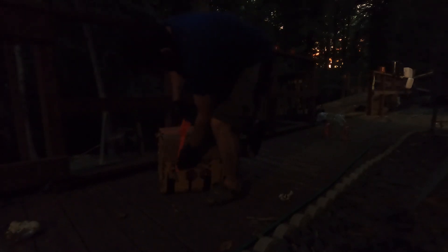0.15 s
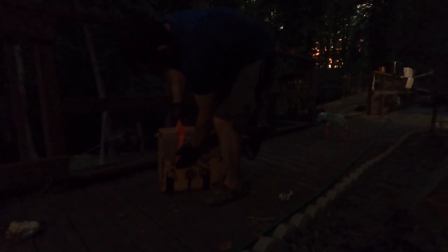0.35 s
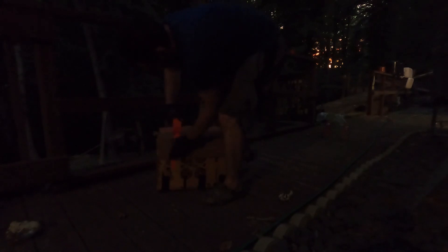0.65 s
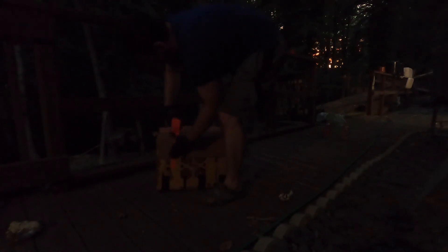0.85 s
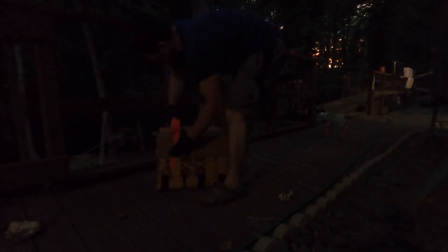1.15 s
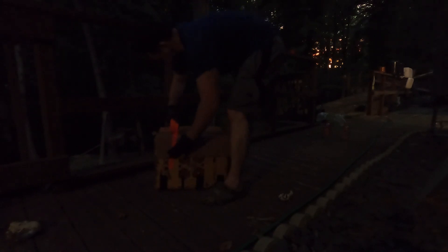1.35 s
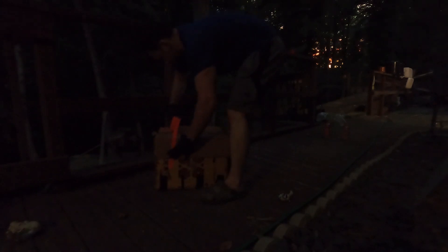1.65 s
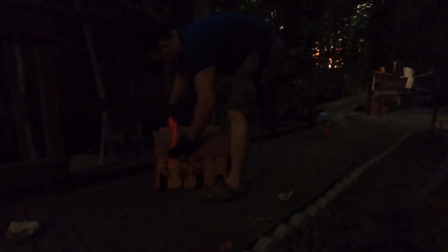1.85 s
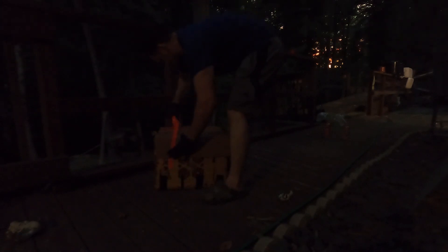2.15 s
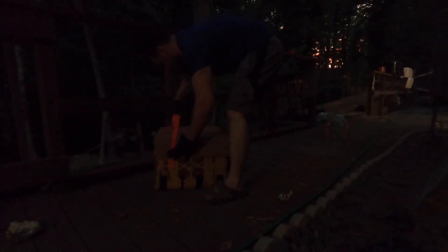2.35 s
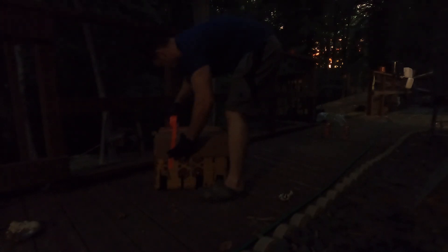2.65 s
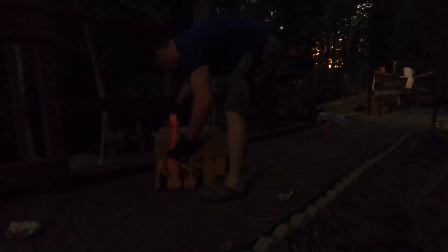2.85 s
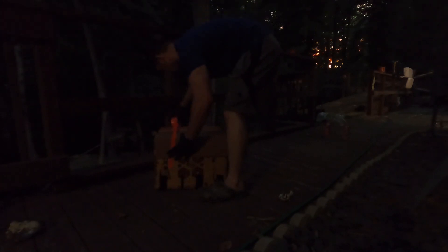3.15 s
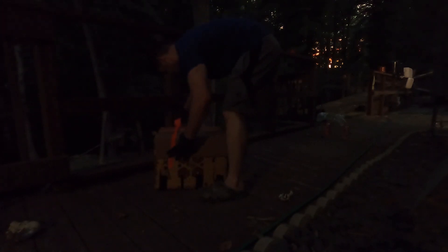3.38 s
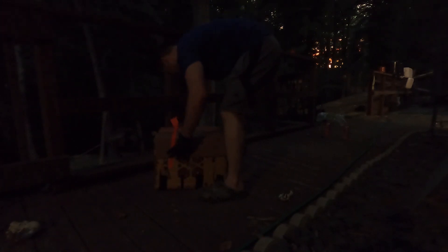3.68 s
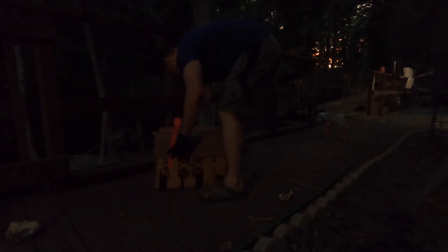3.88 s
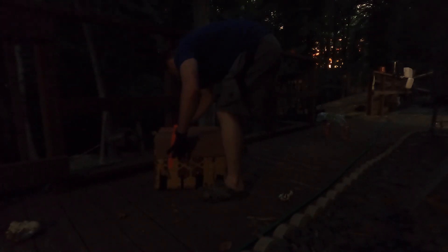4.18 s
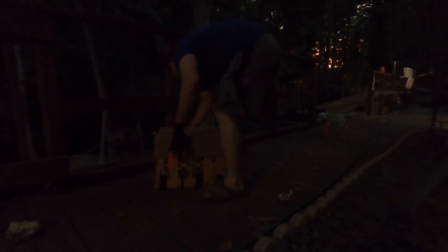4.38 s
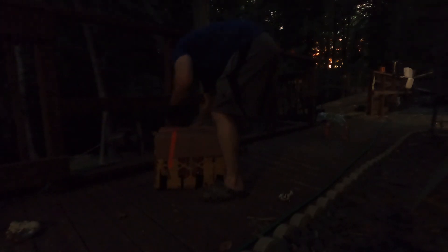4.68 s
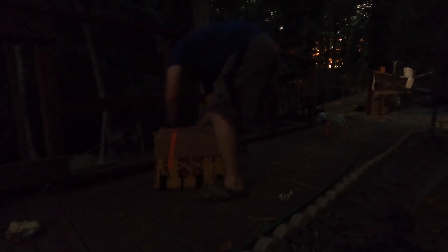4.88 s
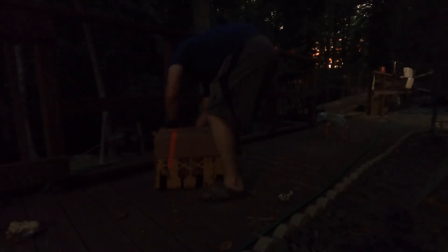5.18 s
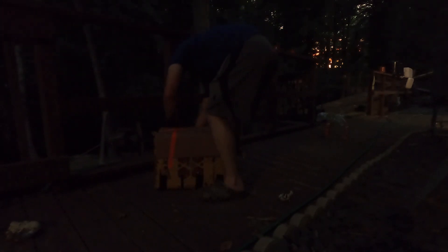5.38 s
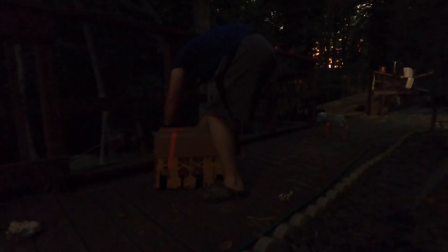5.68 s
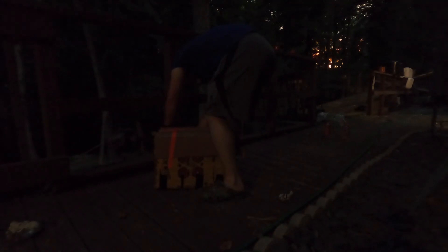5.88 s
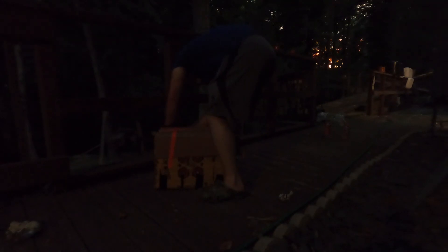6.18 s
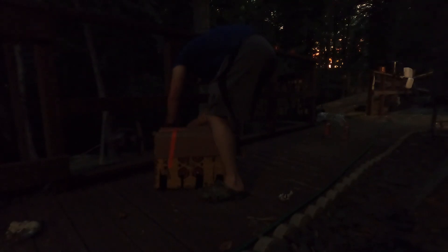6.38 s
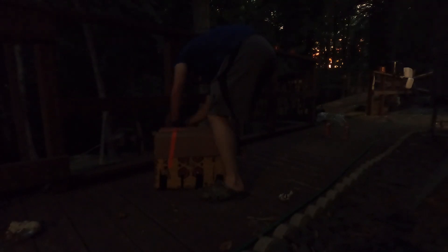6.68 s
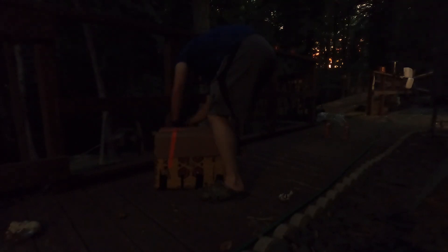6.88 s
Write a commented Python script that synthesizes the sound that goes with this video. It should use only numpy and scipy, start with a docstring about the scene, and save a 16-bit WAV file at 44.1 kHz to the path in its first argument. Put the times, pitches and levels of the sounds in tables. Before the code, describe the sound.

Crickets trill steadily in a yard at night, over a high rasping insect chorus and a faint hush of air. The insects grow slightly louder towards the end. In the first second a metal buckle is tapped lightly, and slack strap slides through it with a soft rasp at about 0.5 seconds. At 1.4 seconds the ratchet is cranked in a quick, loud run of steel clicks. More short runs follow at about 1.8, 2.1, 2.6 and 3 seconds, each with a clink and a dull thump as the taut strap jolts a foam block. After a pause there is a brief burst at 4.1 seconds, a longer, fuller run at 5 seconds and a single click at 6 seconds. Faint handling taps fall between the pulls and continue until about 7 seconds. The ratchet is centred and clear, with a slight outdoor echo.

```python
"""Ratchet strap at night

A ratchet strap is cranked tight around a foam target block in a yard. The pawl (the buckle's catch)
skips over the teeth in short uneven runs; each snap rings the steel and, through the taut strap,
thumps the block. Crickets trill with their wings over a chorus of other insects and a soft hush.
The recorder's gain control turns everything down after a loud pull, then slowly back up."""
import sys
import numpy as np
from scipy import signal
from scipy.fft import rfft, irfft, next_fast_len
from scipy.io import wavfile
from scipy.ndimage import uniform_filter1d

SR = 44100
rng = np.random.default_rng(int(sys.argv[2]) if len(sys.argv) > 2 else 0)


def materialize(psi):
    """Save the field psi as 16-bit PCM at rate SR to the path in sys.argv[1].

    A 1-D psi becomes a single channel; in a 2-D psi each row is a channel.
    """
    bounded = np.clip(np.atleast_2d(psi).T, -1, 1)
    quanta = np.round(bounded * 32767).astype(np.int16)
    wavfile.write(sys.argv[1], SR, quanta)


N = 310023
TIME = np.arange(N) / SR


def ratchet():
    """Each pull of the handle drives the pawl over a run of teeth."""
    # (start [s], length [s], teeth [count], slowing [-1..1], block thump [relative dB], its rise [dB],
    #  frame knock, pawl clink, edge tick [relative dB], rise of clink and tick [dB], strap pitch [Hz],
    #  its sag [octaves], twang [relative dB], frame's favoured pitch [Hz], handle ring [relative dB])
    pulls = [(1.3951, 0.13, 24, 0.046, -30, 14.5, -19.5, -29, -42, -2.5, 490, 1.15, 0.5, 1440, -5.5),
             (1.769, 0.059, 10, 0.43, -25.5, 3.5, -16.5, -27.5, -36.5, 6, 314, 1.05, 0.5, 1420, -8),
             (1.8592, 0.038, 4, 0.3, -22.5, 0, -15.5, -23, -29.5, -1, 496, 0.1, 3, 1310, -5),
             (2.1214, 0.083, 12, 0.1, -24.5, -3, -17.5, -25, -35.5, 6.5, 430, 1.3, 0.5, 1230, -5.5),
             (2.6053, 0.041, 3, 0.23, -21, 2, -16, -20.5, -28.5, -1, 502, 0.87, -2.5, 1250, -7),
             (3.0004, 0.032, 4, 0.1, -24.5, 1, -17.5, -29.5, -35, 7, 427, 0.085, -6, 1650, -10.5),
             (3.0479, 0.0162, 3, 0.6, -25.5, 3.5, -17, -24.5, -33, 6.5, 410, 0.042, -8, 1580, -8.5),
             (4.1253, 0.0325, 6, -0.6, -22.5, -6, -20.5, -29, -44, 3, 366, 0, -2.5, 1570, -9.5),
             (5.0341, 0.11, 14, -0.077, -19, -1.5, -19, -30, -53, 1.5, 371, 0.082, 3, 1370, -9.5),
             (6.0217, 0.0041, 1, 0.34, -21.5, 1.5, -18, -31, -59, -1, 358, 0, 0.5, 1350, -6)]
    return buckle(np.vstack([teeth(pull) for pull in pulls]), twang_boost_db=-2.5)


def teeth(pull):
    """List one blow per tooth: the run slows or quickens, and the effort peaks in mid-pull."""
    (start_s, length_s, count, slowing, thump_db, thump_rise_db, knock_db, clink_db, tick_db,
     clink_rise_db, strap_hz, sag, twang_db, frame_hz, handle_db) = pull
    mid_pull_db, scatter_db, timing_jitter = 2, 1.38, 0.1
    along = np.linspace(0, 1, count)
    middle = np.sin(np.pi * along)
    chance = rng.standard_normal((count, 4)).T
    jitter = timing_jitter * middle * chance[0] / count
    s = start_s + length_s * (along - slowing * along * (1 - along) + jitter)
    thump, knock, clink = mid_pull_db * middle + scatter_db * chance[1:]
    thump += thump_rise_db * (along - .5)
    clink += clink_rise_db * (along - .5)
    return np.transpose(np.broadcast_arrays(
        s, thump_db + thump, knock_db + knock, clink_db + clink, tick_db + clink,
        strap_hz * 2 ** (-sag * along), twang_db, frame_hz, handle_db))


def buckle(blows, twang_boost_db):
    """The frame jerks, the pawl lands just after, and the strap twangs and jolts the block."""
    # how the free length of strap rings: (multiple of its pitch, level [dB], time to fall 60 dB [s])
    strap_modes = [(1, -1, 0.047), (2, -12.5, 0.026)]
    # how each part rings: (pitch [Hz], level [dB], time to fall 60 dB [s])
    block_modes = [(99, -7, 0.095), (128.4, -6, 0.074), (228, -5.5, 0.032), (279, -2, 0.027),
                   (347, -1, 0.036), (425, -2.5, 0.067), (505, -1, 0.06), (626, -3, 0.041), (773, 3, 0.021)]
    frame_modes = [(955, -0.5, 0.019), (1217, -6, 0.029), (1342, 1, 0.039), (1560, 1, 0.012),
                   (1730, 0, 0.032), (1870, -9, 0.033)]
    handle_modes = [(2090, -1, 0.026), (2286, -0.5, 0.022), (2500, -0.5, 0.026), (2674, -0.5, 0.019),
                    (2927, -1.5, 0.02)]
    pawl_modes = [(3324, 0.5, 0.028), (3746, 2.5, 0.021), (4270, -1, 0.016), (4706, 0.5, 0.014),
                  (5240, 2, 0.011), (5970, -2, 0.02), (6400, -1, 0.014), (7130, 0.5, 0.014)]
    edge_modes = [(8970, -5, 0.015), (9200, 2.5, 0.015), (10120, -0.5, 0.018), (10800, -0.5, .01),
                  (11700, -11, .008)]
    s, block_db, frame_db, pawl_db, edge_db, strap_hz, twang_db, frame_hz, handle_db = np.transpose(blows)
    pawl_hz = 6000 * 2 ** ((edge_db - pawl_db) / 30)   # a softer landing is duller
    twang = struck(s, block_db + twang_db + twang_boost_db, strap_modes, lag_s=.0015, rise_s=.00078,
                   scatter_db=4, detune=.014, favoured_hz=strap_hz, focus_db=0, pitch=strap_hz)
    block = struck(s, block_db - np.maximum(twang_db, 0), block_modes, lag_s=.0012, rise_s=.00078,
                   scatter_db=3.5, detune=.032, favoured_hz=strap_hz, focus_db=2.5)
    frame = struck(s, frame_db, frame_modes, lag_s=.0001, rise_s=.00015,
                   scatter_db=2.5, detune=.0077, favoured_hz=frame_hz, focus_db=9.5)
    handle = struck(s, frame_db + handle_db, handle_modes, lag_s=.0002, rise_s=.00011,
                    scatter_db=2, detune=.018, favoured_hz=2500, focus_db=-3)
    pawl = struck(s, pawl_db, pawl_modes, lag_s=.0005, rise_s=.00075,
                  scatter_db=2.5, detune=.051, favoured_hz=pawl_hz, focus_db=14.5)
    edge = struck(s, edge_db, edge_modes, lag_s=.00054, rise_s=.0001,
                  scatter_db=0, detune=.029, favoured_hz=9500, focus_db=7)
    grind = from_db(6) * crunch(s, pawl_db, length_s=.012, low_hz=2750, high_hz=5430)
    # the strap slips on the spool
    creak = from_db(-14.5) * crunch(s, frame_db, length_s=.026, low_hz=746, high_hz=1910)
    snap = from_db(12) * crunch(s, edge_db, length_s=.0015, low_hz=4500, high_hz=11500)
    thump = band(from_db(-3) * block + from_db(-5.5) * twang, 83, 1640)   # small block: no deep bass
    knock = band(from_db(-1.16) * frame + from_db(-1.45) * handle, 510, 4800)
    clink = from_db(-0.54) * band(pawl, 1800, 14000) + from_db(-3) * edge
    return thump + knock + clink + grind + creak + snap


def struck(times, levels_db, modes, lag_s, rise_s, scatter_db, detune, favoured_hz, focus_db, pitch=1):
    """Each blow rings a part's own tones (modes); positive focus favours those near one pitch."""
    base, db, ring_s = np.transpose(modes)[:, :, None]
    t = np.arange(SR // 14) / SR
    out = np.zeros(N)
    dying = from_db(db - 60 * t / ring_s) * (1 - np.exp(-t / rise_s))
    for s, level_db, favoured, scale in np.broadcast(times, levels_db, favoured_hz, pitch):
        strength, shift = rng.standard_normal((2, len(base), 1))
        hz = base * scale * (1 + detune * shift)
        share = from_db(scatter_db * strength - focus_db * np.abs(np.log2(hz / favoured)))
        ring = np.sum(share * dying * np.sin(2 * np.pi * (hz * t + rng.random(hz.shape))), axis=0)
        # the level is the blow's energy spread over a hundredth of a second
        add(out, s + lag_s, from_db(level_db) * ring / np.sqrt(np.sum(ring ** 2) / (SR / 100)))
    return out


def crunch(times, levels_db, length_s, low_hz, high_hz):
    """Surfaces grind for a few milliseconds after each jolt."""
    t = np.arange(SR // 50) / SR
    fade = from_db(-20 * (t / length_s) ** 2)
    envelope = np.zeros(N)
    for s, level_db in zip(times, levels_db):
        add(envelope, s, from_db(level_db) * fade)
    return band(envelope * rng.standard_normal(N), low_hz, high_hz)


def taps(tick_db, tick_growth):
    """Gripping and swinging back the handle taps the buckle; harder contact ticks more."""
    # (time [s], block thump [relative dB], frame knock [relative dB], clink over knock [dB])
    contacts = [(0.034, -47, -36.5, -4), (0.1069, -46, -36, -16), (0.1892, -35, -54, 1),
                (0.5358, -36, -34, -1), (0.9848, -33.5, -45, -5), (1.2161, -37, -41.5, 4.5),
                (1.2963, -35.5, -45, -4), (1.3898, -54, -35, -3), (2.0636, -18.5, -26.5, -17),
                (2.0888, -37, -44, 1), (2.3163, -38.5, -54, -4), (2.5458, -55, -38.5, 6),
                (3.1307, -34.5, -54, -4), (3.4545, -36, -43.5, 2.5), (3.672, -52, -46.5, 0),
                (4.0985, -35, -40.5, 2), (5.0003, -31.5, -31.5, -3.5), (5.4244, -39, -36.5, -7),
                (5.9245, -39, -42.5, 0), (6.36, -42.5, -45.5, 1), (6.9453, -45, -44.5, -5)]
    # the resting buckle:
    # (strap pitch [Hz], twang [relative dB], frame's favoured pitch [Hz], handle ring [relative dB])
    at_rest = (380, -4.5, 1400, -1)
    blows = [(s, thump, knock, knock + hard, knock + tick_db + tick_growth * hard, *at_rest)
             for s, thump, knock, hard in contacts]
    return buckle(blows, twang_boost_db=0.5)


def sliding_strap(snags_per_s, grain_db):
    """Slack strap slides through the slot, its weave catching in many tiny snags."""
    # (fastest moment [s], time to fall 12 dB either side [s], level [dB])
    slides = [(0.403, 0.057, -30.5), (0.51, 0.048, -37), (0.655, 0.037, -50), (0.755, 0.017, -41)]
    # tone of the rubbing: (frequency [Hz], level [dB])
    rub_spectrum = [(80, -14), (200, -4.5), (430, 3), (700, -13), (1500, -5), (3000, -10.5), (6000, -21.5),
                    (12000, -35)]
    speed = sum(from_db(db - 12 * np.abs(TIME - s) / fade_s) for s, fade_s, db in slides)
    snags = (rng.random(N) < snags_per_s / SR) * rng.standard_normal(N) * from_db(grain_db * drift(59))
    return speed * coloured(snags, rub_spectrum)


def yard(x, bounce_s, bounce_db, build_s):
    """Add a bounce off the paving, then scattered echoes from fence and trees."""
    # (band centre [Hz], level [dB], time to fall 60 dB [s])
    echo_bands = [(121, -10, 0.16), (364, -7.5, 0.28), (860, -6, 0.16), (1470, -20.5, 0.48),
                  (3100, -11.5, 0.38), (5900, -10, 0.35), (9900, -7.5, 0.29)]
    t = np.arange(SR // 2) / SR
    centres = np.array(echo_bands)[:, 0]
    edges = [50, *np.sqrt(centres[1:] * centres[:-1]), 14000]
    echo = np.zeros(len(t))
    for (_, db, ring_s), low, high in zip(echo_bands, edges, edges[1:]):
        fade = from_db(-60 * t / ring_s) * (1 - np.exp(-(t / build_s) ** 2))
        noise = band(rng.standard_normal(len(t)), low, high)
        echo += from_db(db) * noise * fade / np.sqrt(np.sum(fade ** 2))
    bounce = from_db(bounce_db) * np.interp(TIME - bounce_s, TIME, x)
    return x + bounce + signal.fftconvolve(x, echo)[:N]


def crickets(throb, flutter_db, overtone_db, pause_db, fade_s):
    """Nearly pure wing tones pulse with the wing strokes; weak trills waver more and break into chirps."""
    # (start [s], end [s], pitch [Hz], level [relative dB])
    trills = [(0, 5.4, 4020, -56.5), (0, 3.7, 4180, -53), (0, 5.6, 4450, -55), (3.8, 4.52, 4170, -55),
              (4.72, 5.05, 4213, -49.5), (4.7, 4.4, 3915, -63), (5.25, 6.3, 4222, -53),
              (5.75, 8.5, 4538, -51.5), (5.801, 6.2, 3900, -53), (6.0, 5.9, 4200, -60)]
    out = np.zeros(N)
    for start_s, end_s, pitch_hz, level_db in trills:
        weakness = np.clip((-50 - level_db) / 5, 0, 1)
        waver_hz = (6.95 + 12 * weakness) * drift(23.6)
        phase = 2 * np.pi * np.cumsum(pitch_hz + waver_hz) / SR
        tone = np.sin(phase) + from_db(overtone_db) * np.sin(2 * phase)
        strokes_hz = 51 * (rng.uniform(1, 1.5) + 0.028 * drift(2.4))
        pulsing = 1 + throb * np.sin(2 * np.pi * np.cumsum(strokes_hz) / SR)
        paused = weakness * np.clip(2 * drift(11) - .5, 0, 1)
        shimmer = from_db(1.5 * weakness * np.clip(drift(45), -2, 2))
        singing = np.clip(1 + np.minimum(TIME - start_s, end_s - TIME) / fade_s, 0, 1)
        gain = from_db(level_db + flutter_db * drift(6.5) + pause_db * paused)
        out += singing * gain * rms_one(tone * shimmer * pulsing)
    return out


def insect_chorus(rasp_db):
    """Many far insects merge into rasping bands of noise."""
    # (centre [Hz], width [Hz], level [dB])
    rasp_bands = [(4170, 710, -55.5), (4940, 600, -60), (6600, 1400, -50.5), (8430, 910, -53.5),
                  (12000, 900, -67.5)]
    # the chorus slowly grows: (time [s], level change [dB])
    swell = [(0, -2.8), (1.3, -2), (3.5, -2), (4.8, -0.5), (5.8, -0.5), (7, 2.1)]
    swell_db = in_time(swell)
    out = np.zeros(N)
    for hz, width, db in rasp_bands:
        wings = rms_one(band(rng.standard_normal(N), hz - width / 2, hz + width / 2))
        out += wings * from_db(db + swell_db + rasp_db * drift(41))
    return out


def night_air(gust_db):
    """Night air and far rumble make a hush that wavers slightly."""
    # tone of the hush: (frequency [Hz], level [dB])
    hush_spectrum = [(25, -22), (55, -10), (120, 2), (200, -5.5), (320, -6.5), (600, -8), (1000, -7.5),
                     (1500, -13), (2300, -19.5), (3400, -12), (5000, -14), (8000, -27), (10000, -26),
                     (13000, -45)]
    # its loudness: (time [s], level [dB])
    hush_levels = [(0, -43.5), (1.2, -42.5), (2.5, -43.5), (3.6, -45.5), (4.8, -44.5), (5.7, -44.5),
                   (7, -44)]
    gain = from_db(in_time(hush_levels) + gust_db * drift(4.1))
    return gain * coloured(rng.standard_normal(N), hush_spectrum)


def side_hiss():
    """A hiss that differs between the ears."""
    # (frequency [Hz], level [dB])
    hiss_spectrum = [(30, 10), (120, 3), (500, 0), (2500, -6), (5000, -12), (9000, -21), (12500, 4),
                     (14000, 1)]
    return coloured(rng.standard_normal(N), hiss_spectrum)


def treble_width(x, lag_s, corner_hz, top_db, broad_db, lean_db):
    """The highest treble spreads between the ears and is a little louder on the left."""
    treble = signal.butter(4, corner_hz, "high", fs=SR, output="sos")
    unlike = from_db(top_db) * signal.sosfilt(treble, x) + from_db(broad_db) * np.diff(x, prepend=0)
    return np.interp(TIME - lag_s, TIME, unlike) + from_db(lean_db) * signal.sosfiltfilt(treble, x)


def gain_control(x, threshold_db, release_db_per_s):
    """Loud sound pulls the gain down at once; it creeps back up."""
    power = uniform_filter1d(np.mean(x ** 2, axis=0), size=256)
    over_db = np.maximum(10 * np.log10(np.maximum(power, 1e-12)) - threshold_db, 0)
    held_db = np.maximum.accumulate(over_db + release_db_per_s * TIME) - release_db_per_s * TIME
    return x * from_db(-uniform_filter1d(held_db, size=64))


def from_db(db):
    """Turn decibels into a multiplier."""
    return 10 ** (np.asarray(db) / 20)


def rms_one(x):
    """Scale a signal to an average power of 1."""
    return x / np.sqrt(np.mean(x ** 2) + 1e-20)


def in_time(rows):
    """Join (time, value) points with straight lines."""
    return np.interp(TIME, *np.transpose(rows))


def drift(rate_hz):
    """A smooth random wobble, typically of size 1."""
    step = 32
    size = next_fast_len(N // step + 1)
    hz = np.arange(size // 2 + 1) * SR / step / size
    slow = irfft(rfft(rng.standard_normal(size)) / (1 + (hz / rate_hz) ** 2), size)
    return np.interp(TIME, np.arange(size) * step / SR, rms_one(slow))


def coloured(x, spectrum):
    """Shape a signal's tone along (Hz, dB) points, at an average power of 1."""
    hz, db = np.transpose(spectrum)
    log_hz = np.log(np.arange(N // 2 + 1) * SR / N + 1)
    return rms_one(irfft(rfft(x) * from_db(np.interp(log_hz, np.log(hz), db)), N))


def band(x, low_hz, high_hz):
    """Keep the sound between two frequencies."""
    return signal.sosfilt(signal.butter(2, [low_hz, high_hz], "band", fs=SR, output="sos"), x)


def add(track, s, sound):
    """Mix a sound into a track at a given time."""
    at = max(int(s * SR), 0)
    track[at:at + len(sound)] += sound[:max(N - at, 0)]


def scene():
    """Strap and night sit in the centre; mainly high treble and a faint hiss differ between the ears."""
    strap = from_db(2) * ratchet()
    strap += from_db(0.36) * taps(tick_db=-8, tick_growth=1.36)
    strap += sliding_strap(snags_per_s=2500, grain_db=5)
    night = from_db(1.5) * crickets(throb=0.12, flutter_db=2, overtone_db=-17, pause_db=-11, fade_s=0.17)
    night += insect_chorus(rasp_db=0.8) + night_air(gust_db=1.3)
    mid = yard(strap, bounce_s=.0026, bounce_db=-16.5, build_s=.0032) + night
    side = from_db(-70) * side_hiss()
    side += treble_width(mid, lag_s=.0011, corner_hz=12700, top_db=-3, broad_db=-33.5, lean_db=-7)
    return np.array([mid + side, mid - side])


def record(dry):
    """The recorder turns loud moments down, rounds off peaks and cuts the highest treble."""
    ceiling, cutoff_hz = 0.48, 15000
    levelled = gain_control(dry, threshold_db=-13, release_db_per_s=3)
    rounded = levelled / (1 + (levelled / ceiling) ** 4) ** .25
    return signal.sosfilt(signal.cheby2(12, 60, cutoff_hz, fs=SR, output="sos"), rounded)


dry = scene()
out = record(dry)
materialize(out)
```